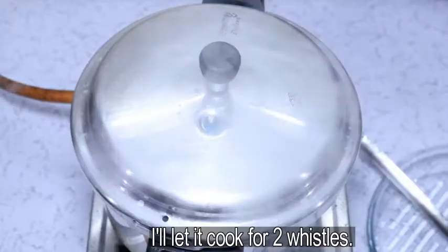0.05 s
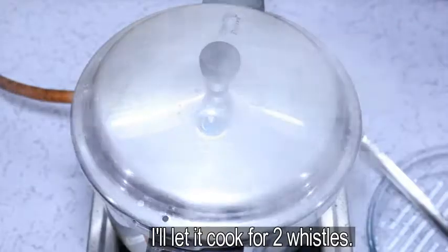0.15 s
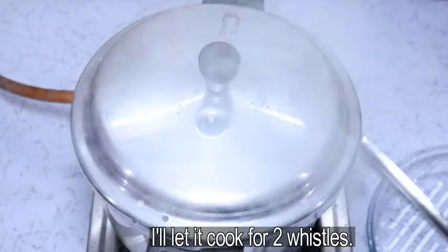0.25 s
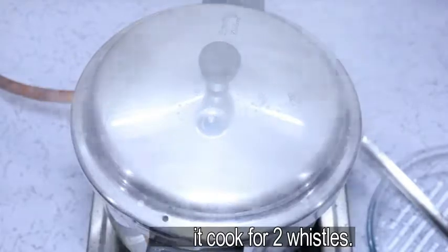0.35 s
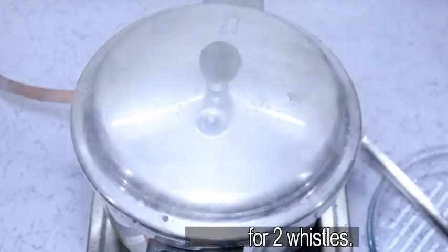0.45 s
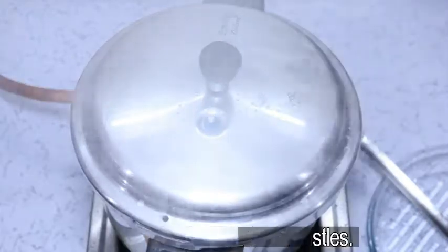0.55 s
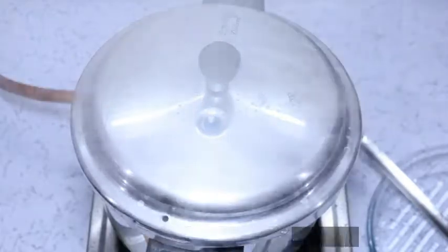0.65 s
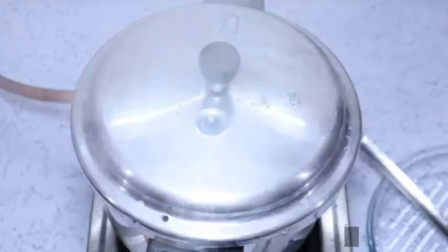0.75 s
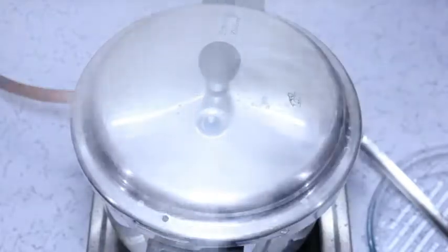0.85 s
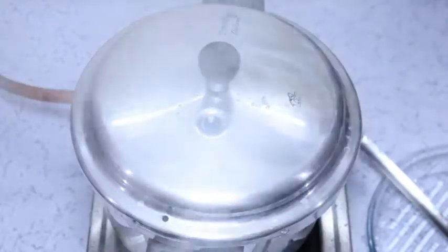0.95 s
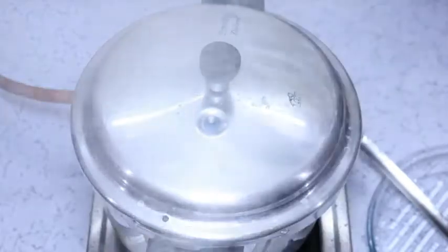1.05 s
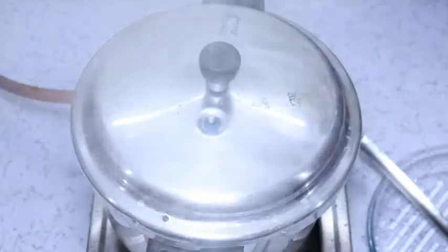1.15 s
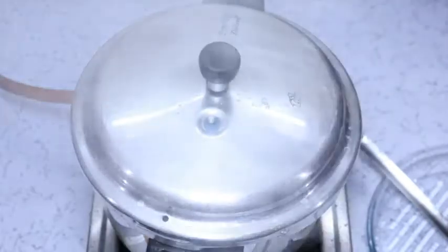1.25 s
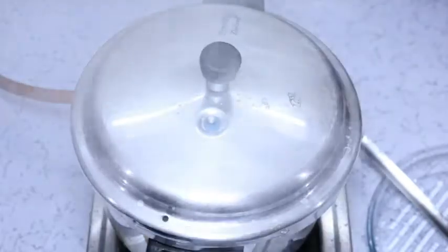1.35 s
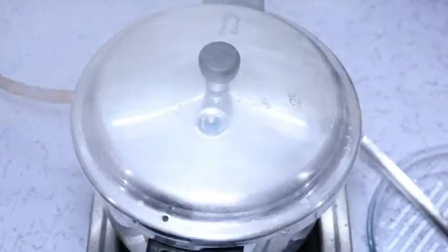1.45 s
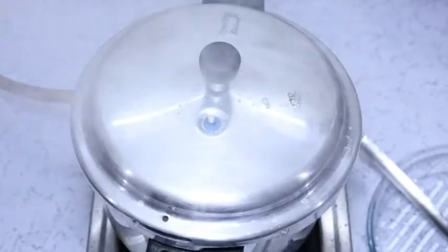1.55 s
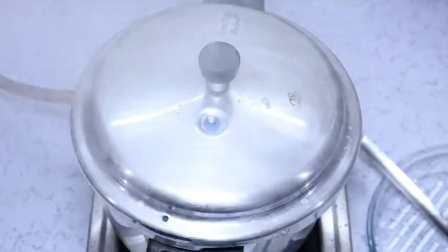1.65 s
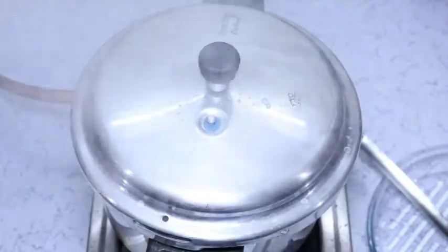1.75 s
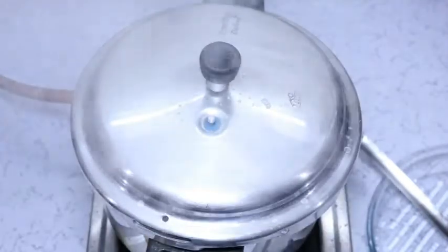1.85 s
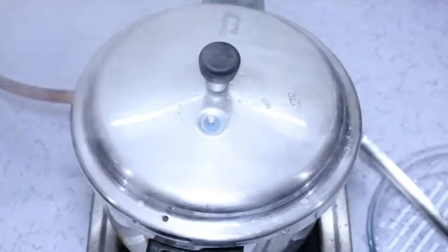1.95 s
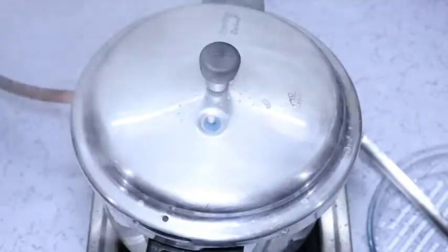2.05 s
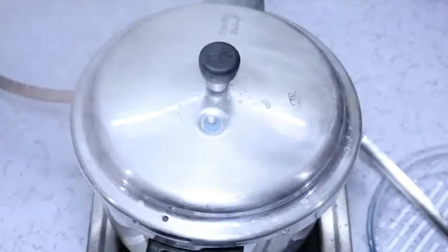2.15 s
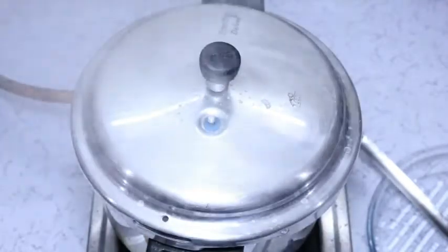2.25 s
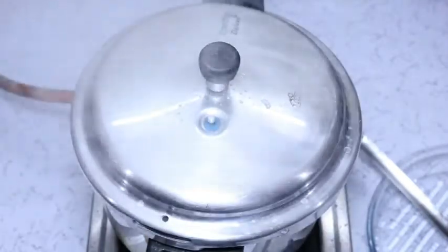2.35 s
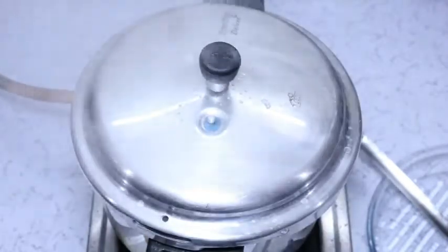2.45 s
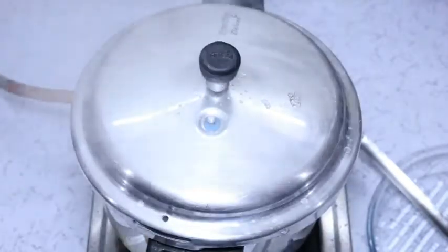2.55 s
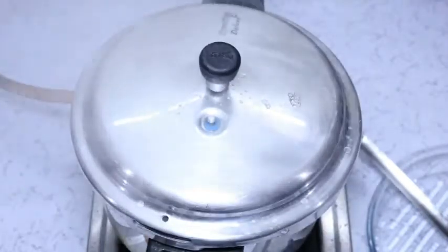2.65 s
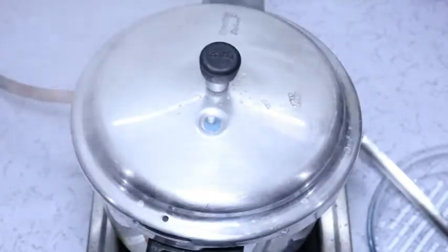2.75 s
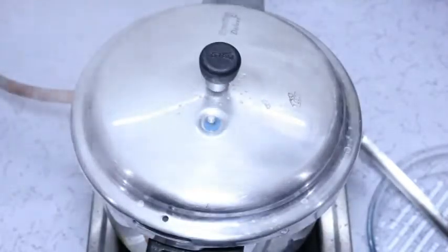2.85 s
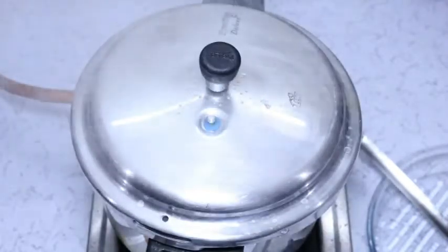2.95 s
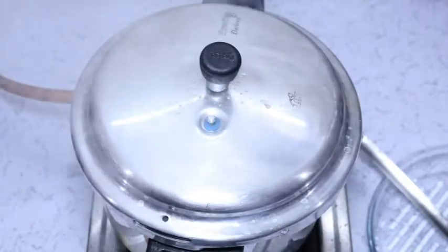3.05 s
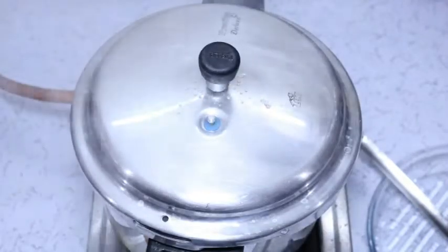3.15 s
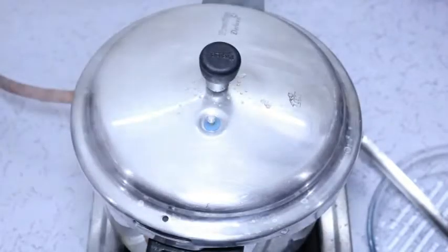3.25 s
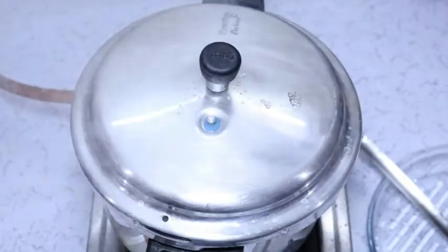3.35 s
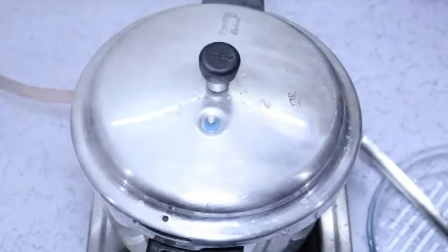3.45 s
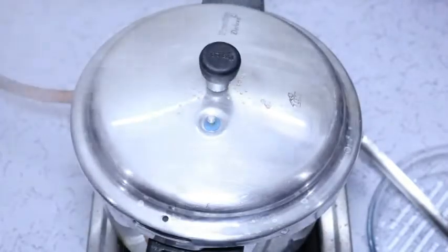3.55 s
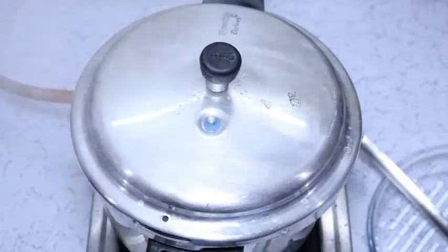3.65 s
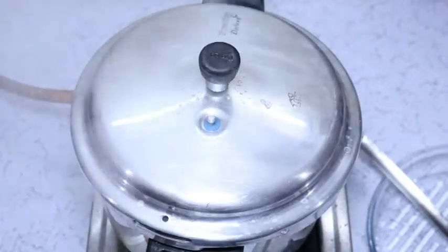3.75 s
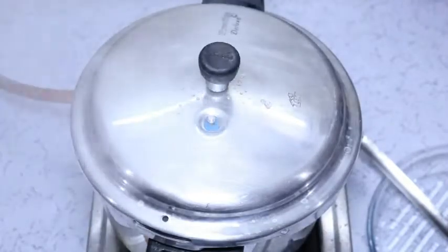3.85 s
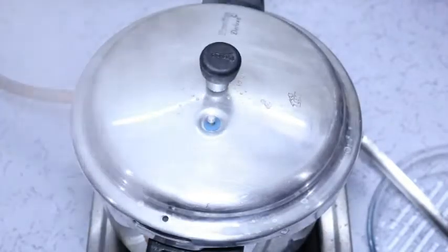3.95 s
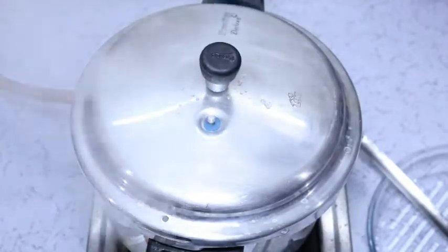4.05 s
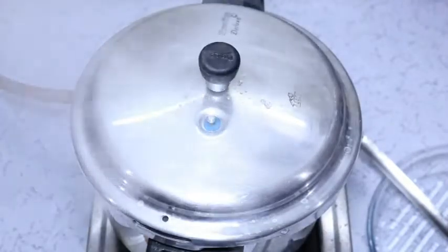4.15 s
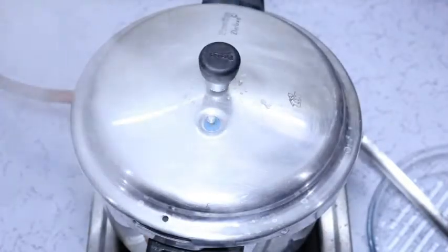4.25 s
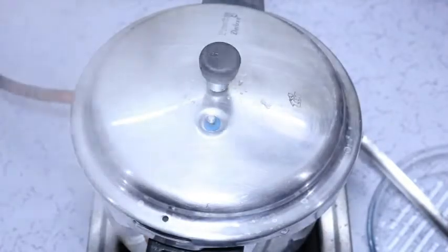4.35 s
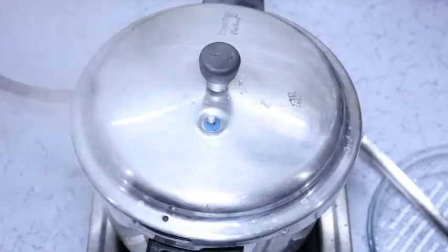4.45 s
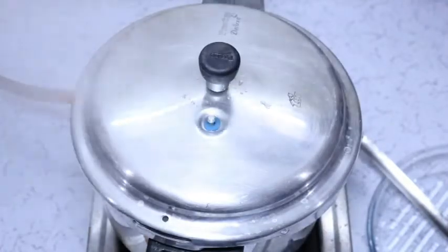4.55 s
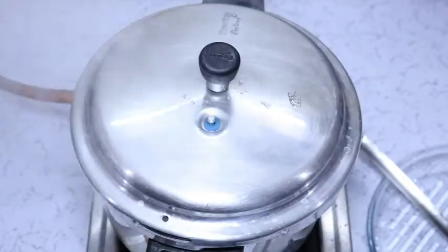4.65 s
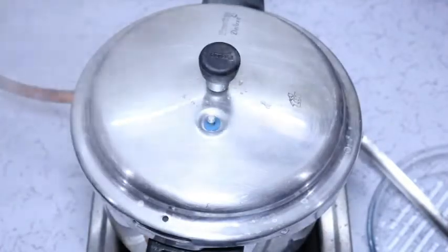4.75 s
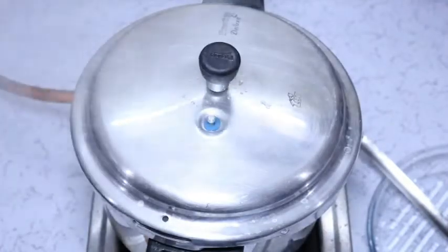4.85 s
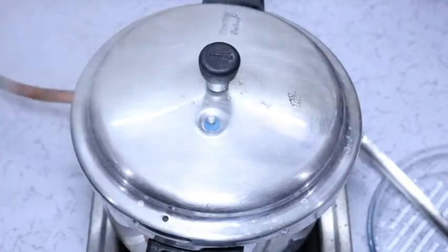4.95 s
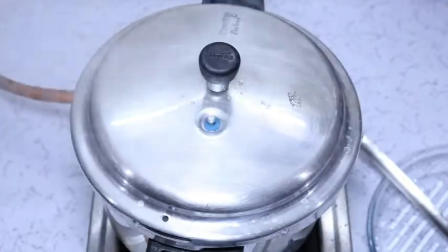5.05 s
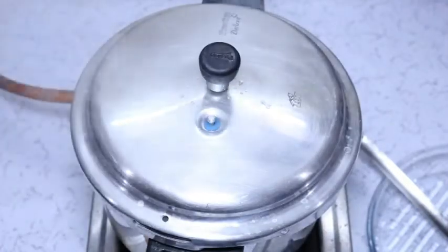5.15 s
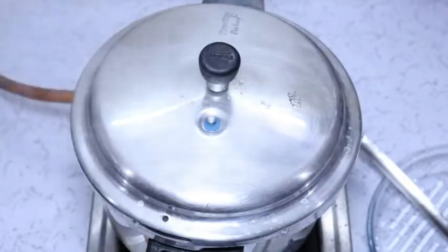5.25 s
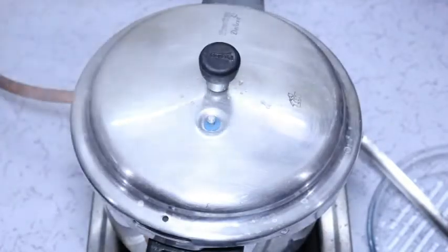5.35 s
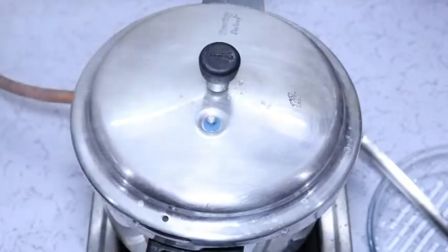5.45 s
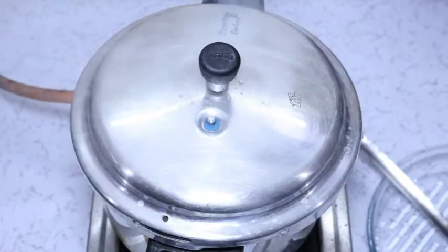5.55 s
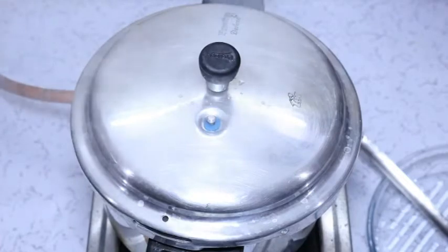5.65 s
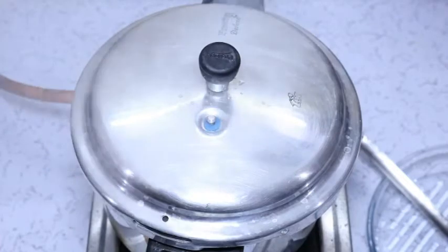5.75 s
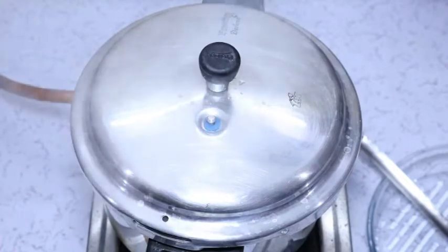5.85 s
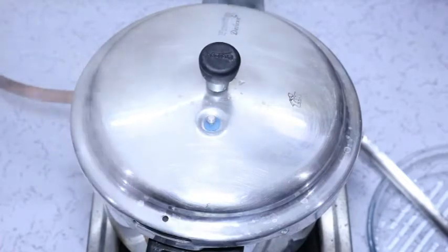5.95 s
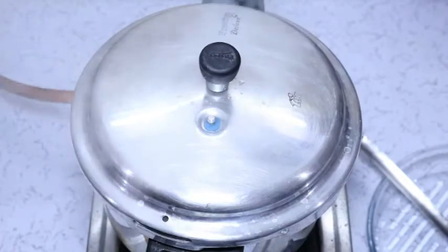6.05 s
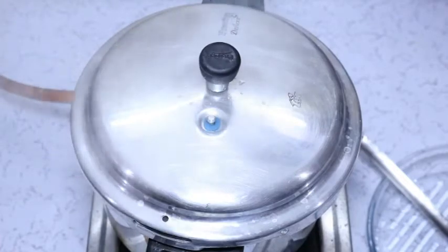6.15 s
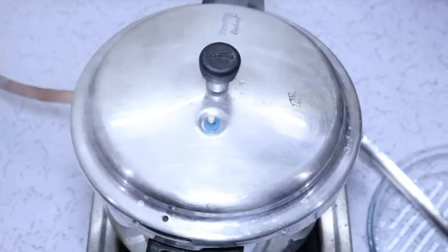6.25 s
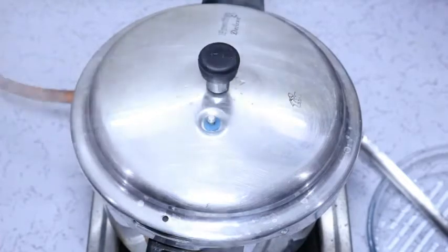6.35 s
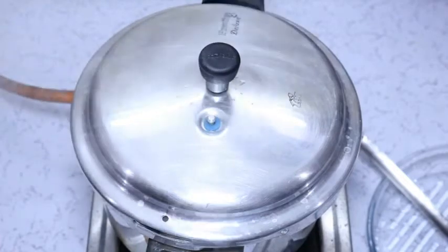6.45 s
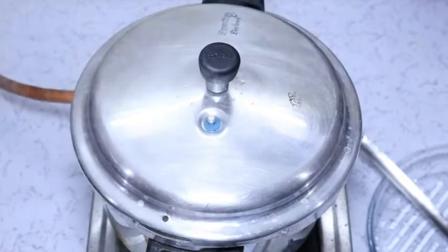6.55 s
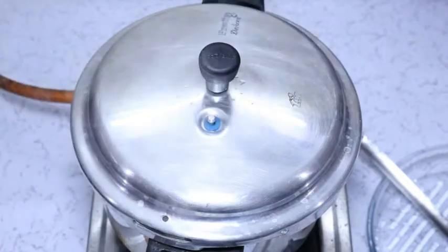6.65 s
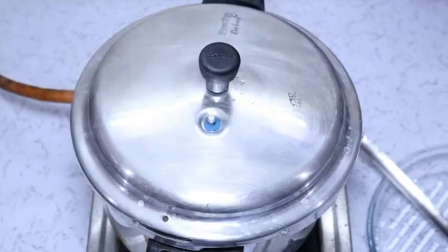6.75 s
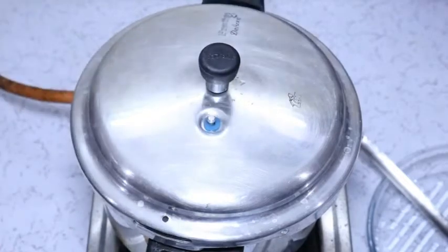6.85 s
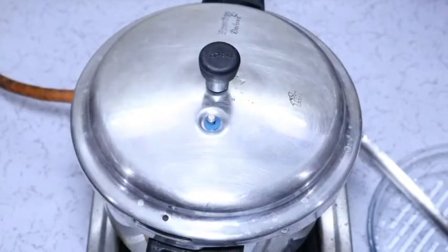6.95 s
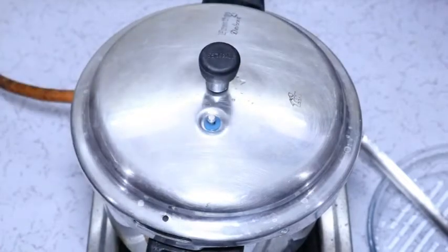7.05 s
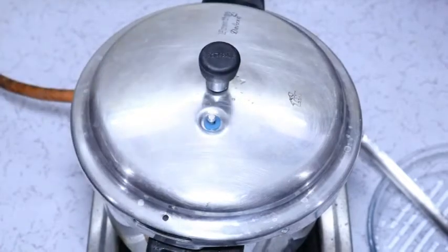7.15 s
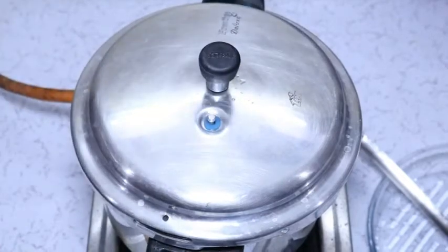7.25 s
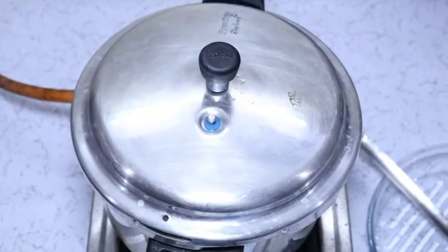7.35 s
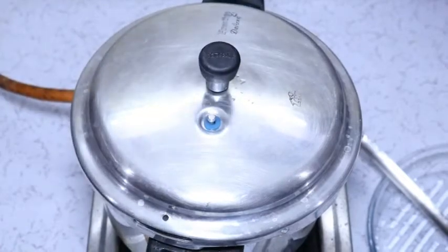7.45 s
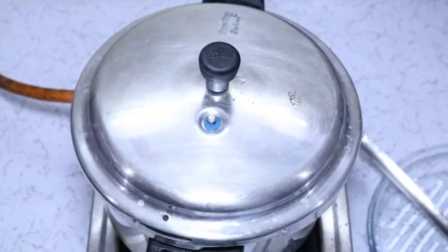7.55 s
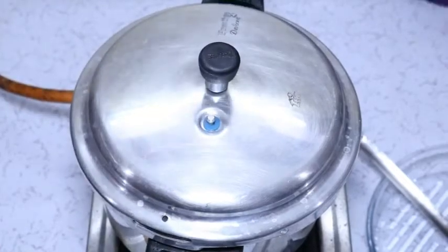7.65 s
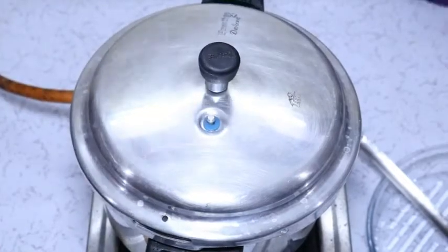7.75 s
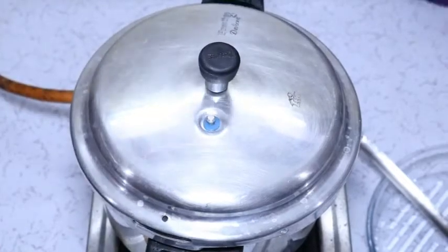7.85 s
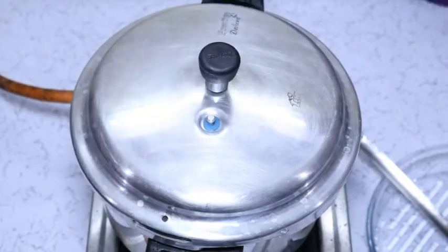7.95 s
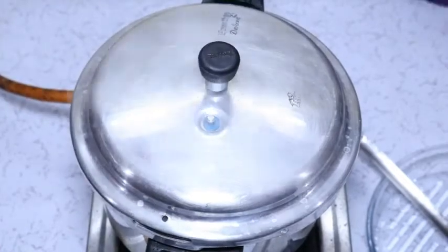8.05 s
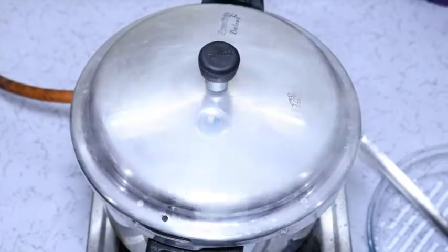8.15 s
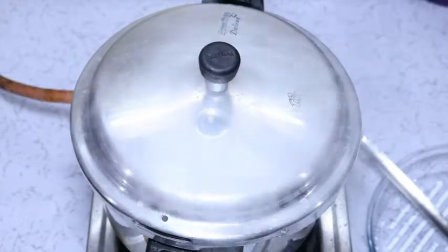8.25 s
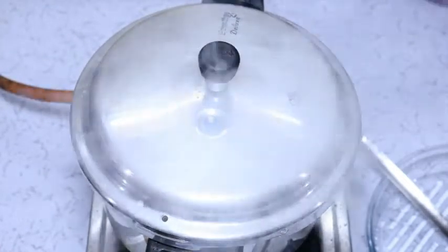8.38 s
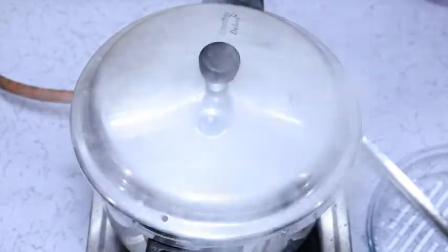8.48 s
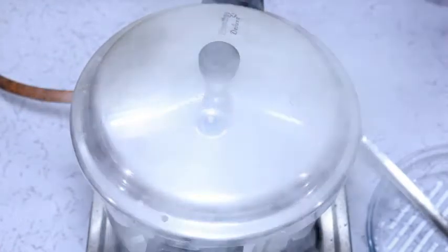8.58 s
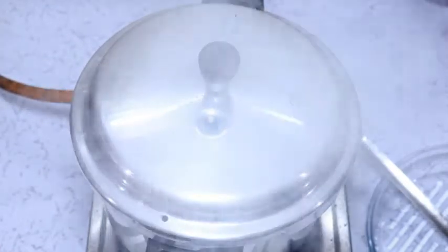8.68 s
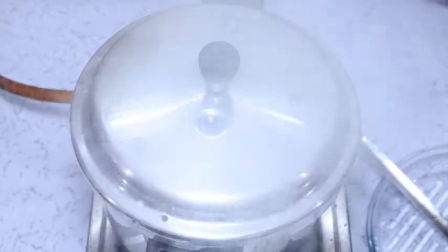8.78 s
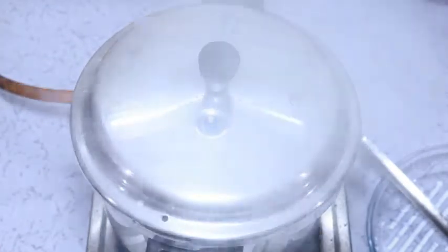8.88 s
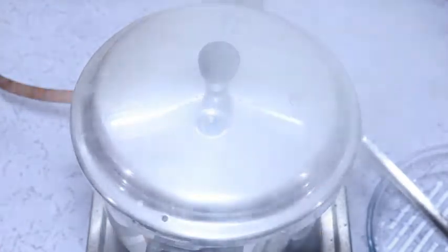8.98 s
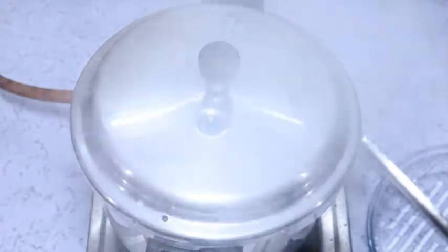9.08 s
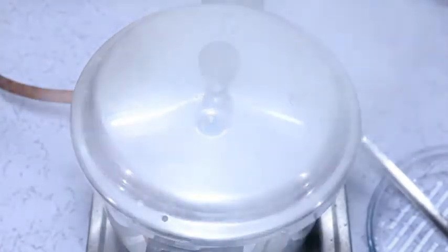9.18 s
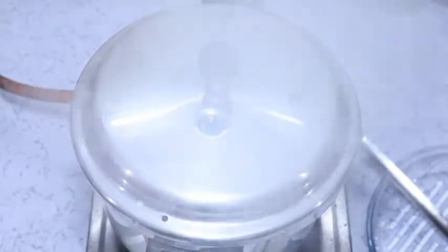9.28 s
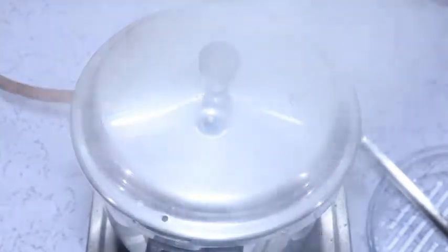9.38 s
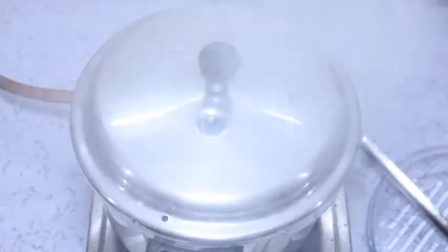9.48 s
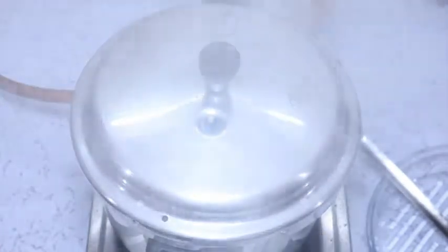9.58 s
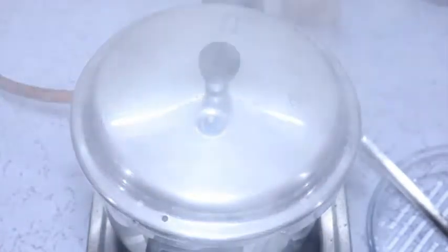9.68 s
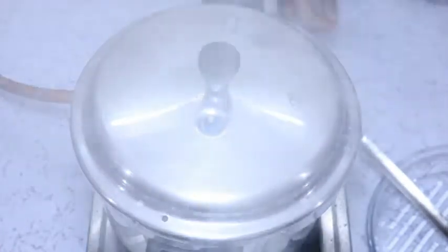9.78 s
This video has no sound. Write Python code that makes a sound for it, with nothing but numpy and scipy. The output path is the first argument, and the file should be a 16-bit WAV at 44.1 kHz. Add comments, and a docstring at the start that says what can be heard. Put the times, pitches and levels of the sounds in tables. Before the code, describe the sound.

Loud steam roars from a stovetop cooker, stops with a brief gurgling warble, leaves faint hum, then leaks harder and erupts again.

```python
"""Steam roars from under the lifted weight of a pressure cooker on a gas stove, sputtering with water. The
blast dies with a short warble and the weight clicks onto its seat; a faint leak and a fan's hum remain. After a
brief gap the scene changes: the fan is gone and the valve leaks harder, until it lifts for a second blast.
Steam, warble and water are shaped noise, the weight is ringing modes, the fan is harmonics and low noise."""
import sys
import numpy as np
from scipy import signal
from scipy.fft import rfft, irfft
from scipy.io import wavfile

SR = 44100
rng = np.random.default_rng(int(sys.argv[2]) if len(sys.argv) > 2 else 0)


def bounce(signal):
    """Save signal as a 16-bit WAV file at the path given by the first command-line argument."""
    frames = np.transpose(np.atleast_2d(signal))
    limited = np.clip(frames, -1, 1)
    pcm = np.round(limited * 32767).astype(np.int16)
    wavfile.write(sys.argv[1], SR, pcm)


N = 433062
TIME = np.arange(N) / SR
FREQS = np.maximum(np.arange(N // 2 + 1) * SR / N, 1)


def from_db(db):
    """Decibels to gain."""
    return 10 ** (np.asarray(db) / 20)


def rms_one(x):
    """Scale to an rms of 1."""
    return x / np.sqrt(np.mean(x ** 2) + 1e-20)


def white():
    """Spectrum of fresh white noise."""
    return rng.standard_normal(len(FREQS)) + 1j * rng.standard_normal(len(FREQS))


def drift(rate_hz):
    """Slow random curve with an rms of 1: noise through two equal poles at rate_hz."""
    step = 40  # samples per point of the curve
    pole = np.exp(-2 * np.pi * rate_hz * step / SR)
    noise = rng.standard_normal(N // step + 2002)
    slow = signal.lfilter([1], [1, -2 * pole, pole * pole], noise)[2000:]
    return np.interp(np.arange(N) / step, np.arange(len(slow)), rms_one(slow))


# Resonances and notches of lid, stove and walls.
# Each row: centre in Hz, width at half the dB in Hz, height in dB.
SURROUNDINGS = [(587, 36, 2.5), (664, 30, 3.5), (693, 27, 2.5), (774, 30, 2.5), (902, 30, 3),
                (1000, 280, 3), (1165, 30, 2.5), (1335, 46, 1.5), (1480, 24, 4.5), (1580, 30, 1.5),
                (1750, 220, 1.9), (1975, 35, 1), (2012, 32, -4.5), (2490, 190, 2), (2860, 60, -3),
                (3260, 54, -3), (3450, 14, 5), (3550, 33, 3), (3660, 500, 1), (4340, 60, -3.5),
                (5125, 520, -2.5), (5706, 200, 3), (7170, 120, 2.5), (7560, 370, 4), (8450, 500, -4.5),
                (11930, 480, 4), (13300, 520, 3)]


def colour(points):
    """Gain at every frequency: a smooth spectrum plus the resonances of the surroundings."""
    hz, level_db = np.transpose(points)
    smooth_db = np.interp(np.log(FREQS), np.log(hz), level_db)
    ripple_db = sum(db / (1 + (2 * (FREQS - centre) / width) ** 2) for centre, width, db in SURROUNDINGS)
    return from_db(smooth_db + ripple_db)


def reflections(wet_db, t60_s, count):
    """Gain at every frequency from dense decaying echoes off hard kitchen walls."""
    delay_s = rng.uniform(.003, .09, count)
    echoes = np.zeros(N)
    echoes[(delay_s * SR).astype(int)] = rng.standard_normal(count) * from_db(-60 * delay_s / t60_s)
    wet = from_db(wet_db)
    return (1 + wet * rfft(echoes / np.linalg.norm(echoes))) / np.sqrt(1 + wet ** 2)


def split(spectrum, edges_hz):
    """Part a spectrum into sounds, low to high, with soft edges."""
    below = [0] + [1 / (1 + (FREQS / hz) ** 8) for hz in edges_hz] + [1]
    return [irfft(spectrum * (high - low), N) for low, high in zip(below, below[1:])]


FAN_HZ, FAN_DB = 31.54, -52.5  # mean turning rate, rms of the hum
# Harmonics of the fan. Each row: multiple of the turning rate, relative level in dB.
FAN_HARMONICS = [(1, -24), (2, -16), (3, -23.5), (4, 3), (5, -2.5), (6, -22), (7, -27), (8, -15), (9, -30),
                 (10, -24), (11, -21), (12, -14), (13, -19)]


def fan(wobble, flutter_db, rumble_db, rumble_hz, rumble_width_hz):
    """Motor hum on multiples of a wobbling turning rate; churned air makes it beat unevenly."""
    turns = np.cumsum(FAN_HZ * (1 + wobble * drift(2))) / SR
    hum = np.zeros(N)
    for multiple, db in FAN_HARMONICS:
        tone = np.sin(2 * np.pi * (multiple * turns + rng.random()))
        hum += from_db(db + flutter_db * drift(10)) * tone
    air = irfft(white() / (1 + (2 * (FREQS - rumble_hz) / rumble_width_hz) ** 2), N)
    return from_db(FAN_DB) * rms_one(hum) + from_db(rumble_db) * rms_one(air)


# Colours of the leak after the first blast and before the second.
# Each row: frequency in Hz, relative density in dB per Hz.
FAINT_LEAK = [(25, -12), (100, 0), (210, -9), (350, -4), (600, -5.5), (1250, -6), (2000, -1), (4000, 1),
              (4800, -2), (5800, 0), (7800, -5), (10500, -5), (12800, -8), (15000, -6.5)]
HARD_LEAK = [(25, -23), (210, -20), (600, -17.5), (1250, -14), (1750, -3), (3000, -1.5), (4400, 1),
             (5500, -1), (7000, 0), (9800, -2), (10700, -0.5), (12700, -8), (14000, -4), (15300, 1.5)]


def leak(points, room, level_db):
    """Steam squeezes past the seated weight in a thin, even hiss."""
    hiss = rms_one(irfft(white() * colour(points) * room, N))
    return hiss * from_db(level_db + .2 * drift(10))


def swells(rows):
    """Noise in narrow resonances, each under a Gaussian rise and fall."""
    out = np.zeros(N)
    for peak_s, rise_s, fall_s, hz, width_hz, db in rows:
        resonance = 1 / (1 + (2 * (FREQS - hz) / width_hz) ** 2) ** 2
        tone = rms_one(irfft(white() * resonance, N))
        side_s = np.where(TIME < peak_s, rise_s, fall_s)
        out += tone * from_db(db) * np.exp(-.5 * ((TIME - peak_s) / side_s) ** 2)
    return out


# Each row: peak time in seconds, rise sigma in seconds, fall sigma in seconds, centre in Hz,
# width at quarter gain in Hz, level in dB.
BUMP = [(4.908, .01, 0.077, 513, 420, -45.5), (4.936, 0.02, .03, 326, 70, -45)]


def bump():
    """A dull bump: two overlapping swells of low noise."""
    return swells(BUMP)


# Each row: as for the bump.
LIFT_PUFF = [(8.054, .005, 0.04, 480, 280, -47.5)]


def lift_puff():
    """The puff as the weight lifts: one swell of noise."""
    return swells(LIFT_PUFF)


# Each row: as for the bump.
WARBLE = [(6.3, .005, 0.008, 980, 240, -43), (6.321, .004, 0.005, 960, 240, -41),
          (6.347, 0.0055, 0.0065, 1020, 260, -36), (6.398, .012, 0.044, 935, 200, -39.5),
          (6.375, 0.03, .08, 505, 40, -53), (6.38, 0.041, .04, 470, 380, -55),
          (6.42, 0.033, .025, 700, 130, -50)]


def warble():
    """The closing valve warbles: short swells in quick succession."""
    return swells(WARBLE)


# The weight touches its seat. Each row: time in seconds, relative strength in dB.
TOUCHES = [(6.377, -21), (6.476, -30.5)]
# Modes of the weight. Each row: frequency in Hz, relative level in dB, 60 dB decay in seconds.
WEIGHT_MODES = [(965, -8, .04), (1460, -13, 0.074), (2630, -16, .1), (3630, -7, .04), (3850, -4, .035),
                (5630, -13, .03)]


def weight(level_db):
    """Each touch rings the metal weight's damped modes, with a random strength for every mode."""
    out = np.zeros(N)
    touch_s, touch_db = np.transpose(TOUCHES)
    for hz, mode_db, t60_s in WEIGHT_MODES:
        strength_db = touch_db + mode_db + level_db + rng.normal(0, 1.5, len(touch_s))
        clicks = np.full(N, 1e-18)
        clicks[(touch_s * SR).astype(int)] = from_db(strength_db)
        radius, angle = from_db(-60 / (t60_s * SR)), 2 * np.pi * hz / SR
        zeros = [1, -radius * np.cos(angle)]
        poles = [1, -2 * radius * np.cos(angle), radius * radius]
        out += signal.lfilter(zeros, poles, clicks)
    return out


# Slugs of water spit through the valve.
# Each row: peak time in seconds, length at half power in seconds, band centre in Hz, relative level in dB.
SPITS = [(.091, .04, 1850, -24.5), (0.222, 0.027, 1600, -23), (0.612, 0.022, 1690, -24.5),
         (.665, 0.038, 2380, -25), (1.272, 0.06, 2360, -25.5), (1.444, 0.061, 2500, -25),
         (1.755, 0.04, 1340, -27.5), (1.897, 0.02, 1750, -25), (2.139, .065, 2320, -28),
         (2.499, .044, 2000, -28.5), (2.81, 0.032, 1600, -28), (5.015, .04, 1700, -30.5),
         (8.175, 0.06, 1870, -24.5), (8.427, 0.08, 1910, -24.5), (8.702, 0.06, 1970, -23.5),
         (8.912, 0.021, 2000, -23.5), (8.978, 0.04, 1800, -23.5), (9.12, 0.035, 1680, -24),
         (9.257, 0.035, 1600, -27), (9.418, 0.034, 1420, -23.5), (9.594, 0.032, 1750, -24.5),
         (9.755, 0.027, 1650, -29)]


def spits(room, spread_hz, level_db):
    """Each slug of water gives a short, throaty gust: jet noise through a band-pass run twice."""
    source = irfft(white() * colour(SECOND_JET) * room, N)
    out = np.zeros(N)
    for peak_s, length_s, hz, db in SPITS:
        near = np.abs(TIME - peak_s) < 2 * length_s
        edge = np.sqrt(1 + spread_hz / hz)  # ratio of band edge to centre
        throat = signal.butter(1, [hz / edge, hz * edge], "band", fs=SR, output="sos")
        gust = rms_one(signal.sosfilt(throat, signal.sosfilt(throat, source[near])))
        swell = .5 ** (2 * ((TIME[near] - peak_s) / length_s) ** 2)
        out[near] += gust * from_db(db + level_db) * swell
    return out


def bells(rows):
    """Sum of bell-shaped swells in dB; lengths are taken at half height."""
    return sum(db * .5 ** np.minimum((2 * (TIME - s) / length) ** 2, 20) for s, length, db in rows)


# Wetness and brightness of the jet.
# Each row: time in seconds, low mids over flow in dB, treble over flow in dB.
STEAM = [(0, -12.7, -5.0), (1.1, -11.2, -6.5), (1.85, -11.8, -8.1), (2.35, -11.7, -5), (4.35, -12.3, -4.3),
         (4.75, -9.2, -5.6), (5.1, -8.8, -2.8), (5.45, -10.3, -4.5), (6.2, -12.6, -4.6), (8.1, -11.3, -5),
         (8.7, -12, -3.5), (9.8, -12.7, -4.2)]
# The weight bobs up and the jet surges. Each row: peak time in seconds, length in seconds, flow in dB.
SURGES = [(0.2, 0.14, 0.9), (0.7, 0.2, 0.7), (1.75, 0.25, 0.6), (2.26, 0.25, 1.0), (2.97, 0.11, 1.1),
          (3.25, 0.11, 1.8), (3.58, 0.11, 1.0), (3.88, 0.14, 1.8), (4.26, 0.11, 2.2), (5.45, 0.25, 1.2),
          (5.78, 0.1, 1.4), (8.07, 0.03, 1), (8.41, 0.09, 1.8), (9.3, 0.03, 2.3), (9.6, 0.4, 0.8)]
# Dry steam fizzes and thins the roar. Each row: peak time in seconds, length in seconds, treble in dB.
DRY_PUFFS = [(1.22, 0.06, 3.5), (2.03, 0.12, 2.5), (2.87, 0.08, 2.5), (3.12, 0.1, 3), (3.38, 0.15, 4),
             (3.7, 0.1, 4), (4.09, 0.13, 3.3), (5.71, 0.05, 2.5), (5.98, 0.08, 2), (6.31, 0.07, 5),
             (8.1, 0.05, 4), (8.57, 0.12, 2.2), (8.77, 0.09, 2.5), (9.21, 0.14, 1.8)]
# A surge carries water: dB of low mids gained and of treble lost per dB.
SURGE_WETS, SURGE_DULLS = 0.5, 1.3
PUFF_THINS = 0.36  # dB of flow lost per dB of treble
# The sinking weight chokes the jet by SINK_DB in SINK_S seconds, along a power law.
SINK_S, SINK_DB, SINK_CURVE = 0.21, 27, 1.45
# The choked jet gurgles and loses its fizz: shares of the choking.
SINK_WETS, SINK_DULLS = 0.56, 0.25


def valve(blast):
    """Flow, brightness and wetness in dB from sagging pressure, surges, dry puffs and the sinking weight."""
    lift_s, sink_s, flow_db, sag_db_per_s = blast
    steam_s, *columns = np.transpose(STEAM)
    low_mids_db, treble_db = [np.interp(TIME, steam_s, column) for column in columns]
    surge_db, puff_db = bells(SURGES), bells(DRY_PUFFS)
    choke_db = SINK_DB * np.clip((TIME - sink_s) / SINK_S, 0, 2) ** SINK_CURVE
    sag_db = sag_db_per_s * (TIME - lift_s)
    flow = flow_db - sag_db + surge_db - PUFF_THINS * puff_db - choke_db
    bright = treble_db - SURGE_DULLS * surge_db + puff_db - SINK_DULLS * choke_db
    wetness = low_mids_db + SURGE_WETS * surge_db + SINK_WETS * choke_db
    return flow, bright, wetness


# Colours of the two jets. Each row: frequency in Hz, relative density in dB per Hz.
FIRST_JET = [(25, -38.5), (130, -19.5), (230, -27.5), (400, -21.5), (800, -17.5), (1250, -14.5), (1650, -7),
             (2500, -3), (4400, -0.5), (6500, -8), (8500, -2.5), (9900, -12.5), (12000, -8), (15600, -7.5)]
SECOND_JET = [(25, -38), (130, -29.5), (230, -32), (400, -25.5), (800, -18.5), (1250, -15.5), (1650, -9.5),
              (2500, -3), (4400, 1), (6500, -7.5), (8500, -4.5), (9900, -11.5), (12000, -8.5), (15600, -6)]
# The two blasts, one row each: weight lifts in seconds, starts to sink in seconds (the second
# lies past the end), base flow in dB, sag as the pressure falls in dB per second.
FIRST_BLAST = (-0.05, 6.24, -18.45, 0.71)
SECOND_BLAST = (8.059, 12, -18.75, 0.1)
LIFT_S = 0.024  # length of the weight's pop upward


def jet(blast, points, room, rush_db, sputter_db, core_db, fizz_db, flicker_db):
    """Turbulent steam: flow drives four noise bands, water swells the low mids, dry steam is brighter."""
    flow, bright, wetness = valve(blast)
    bands = split(white() * colour(points) * room, edges_hz=[700, 2500, 10000])
    rush, low_mids, core, fizz = map(rms_one, bands)
    sound = rush * from_db(rush_db + .5 * wetness)
    sound += low_mids * from_db(wetness + sputter_db + flicker_db * drift(12))
    sound += core * from_db(core_db + 0.39 * drift(30))
    sound += fizz * from_db(bright + fizz_db + .6 * drift(25))
    # the weight rocks on the jet and droplets tear through it
    rocking_db = 0.27 * drift(10.4) + .45 * drift(250)
    lifted = np.clip((TIME - blast[0]) / LIFT_S + .5, 0, 1)
    return lifted * sound * from_db(flow + rocking_db)


# The short gap where the scene changes, one row: start in seconds, end in seconds.
SILENCE = (7.589, 7.668)


def scene():
    """First blast, closing and fan; a short gap as the scene changes; hard leak and second blast; alike in both
    ears."""
    room = reflections(wet_db=-10.5, t60_s=0.35, count=120)
    before = jet(FIRST_BLAST, FIRST_JET, room,
                 rush_db=-26.5, sputter_db=-0.5, core_db=-0.5, fizz_db=2.9, flicker_db=1.35)
    before += leak(FAINT_LEAK, room, level_db=-46.5)
    before += fan(wobble=0.00296, flutter_db=1.5, rumble_db=-60.5, rumble_hz=142, rumble_width_hz=55)
    before += warble() + bump() + weight(level_db=-3.5)
    after = jet(SECOND_BLAST, SECOND_JET, room,
                rush_db=-27.5, sputter_db=0, core_db=-0.5, fizz_db=3.5, flicker_db=1.8)
    after += leak(HARD_LEAK, room, level_db=-27.0) + lift_puff()
    silence_start_s, silence_end_s = SILENCE
    fade_s = .002
    sound = before * np.clip((silence_start_s - TIME) / fade_s, 0, 1)
    sound += after * np.clip((TIME - silence_end_s) / fade_s, 0, 1)
    sound += spits(room, spread_hz=2000, level_db=1.7)
    return np.array([sound, sound])


CUTOFF_HZ = 15780


def record(dry):
    """A steep elliptic low-pass cuts the top."""
    return signal.sosfilt(signal.ellip(12, .1, 90, CUTOFF_HZ, fs=SR, output="sos"), dry)


dry = scene()
out = record(dry)
bounce(out)
```